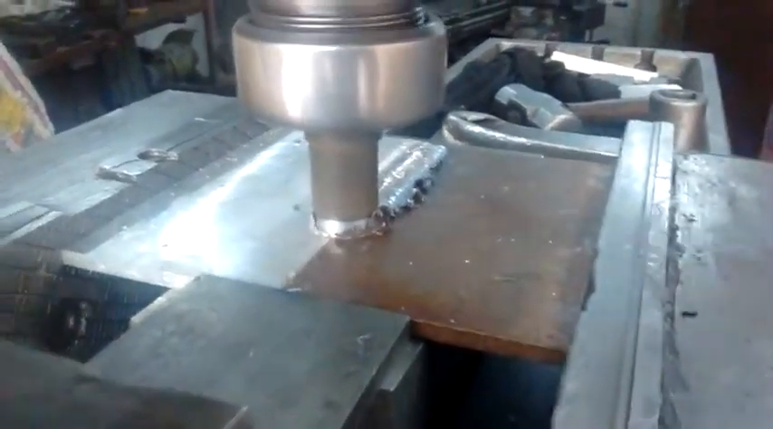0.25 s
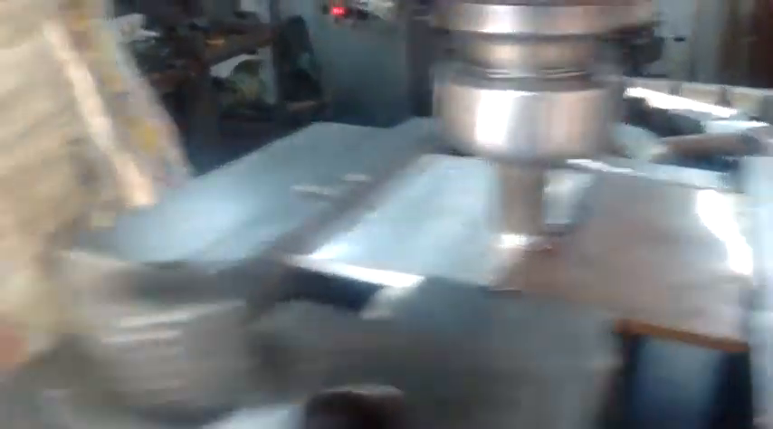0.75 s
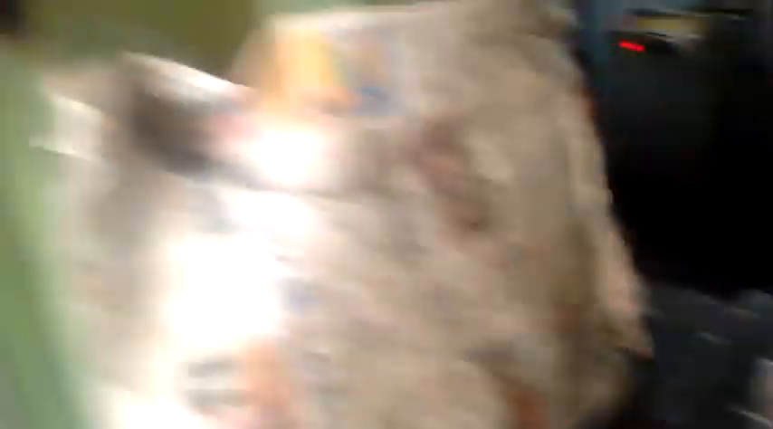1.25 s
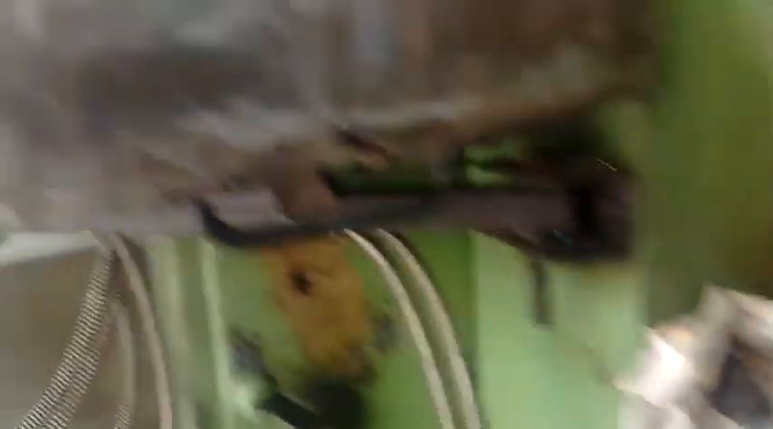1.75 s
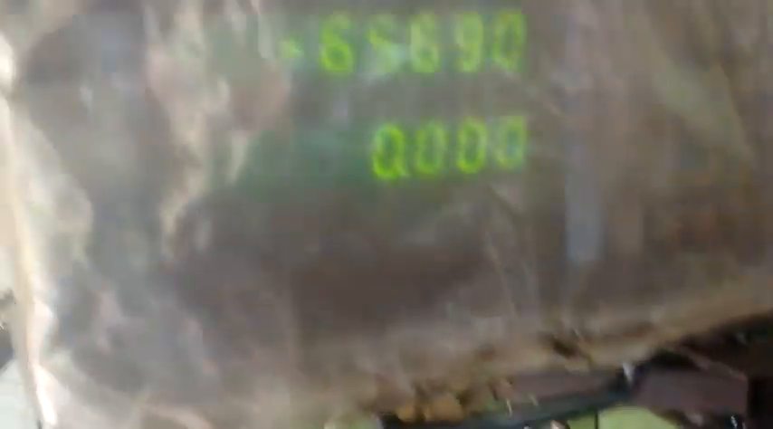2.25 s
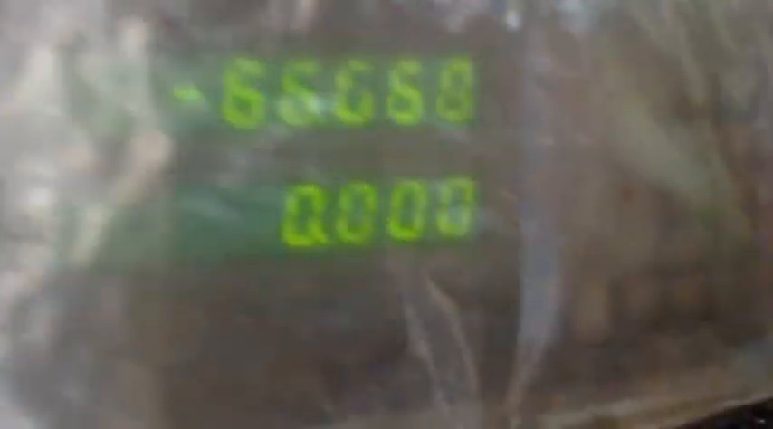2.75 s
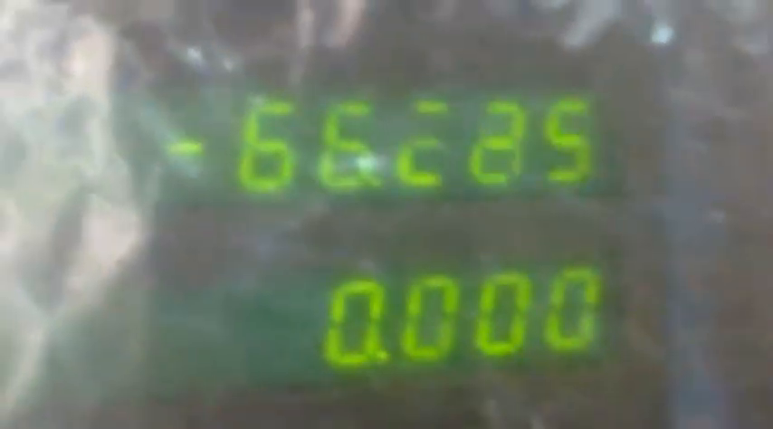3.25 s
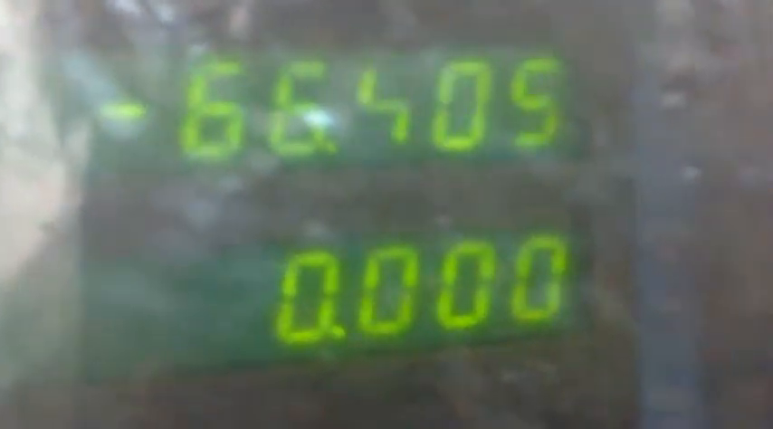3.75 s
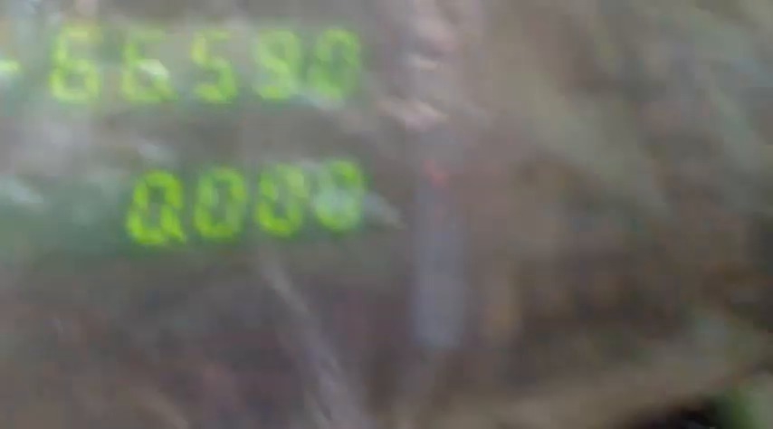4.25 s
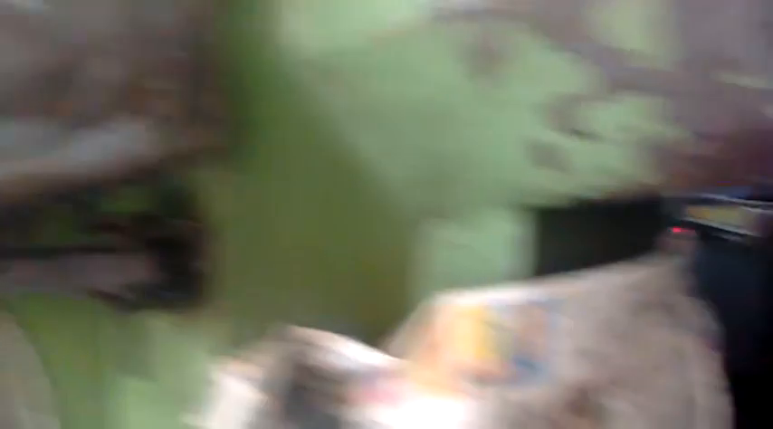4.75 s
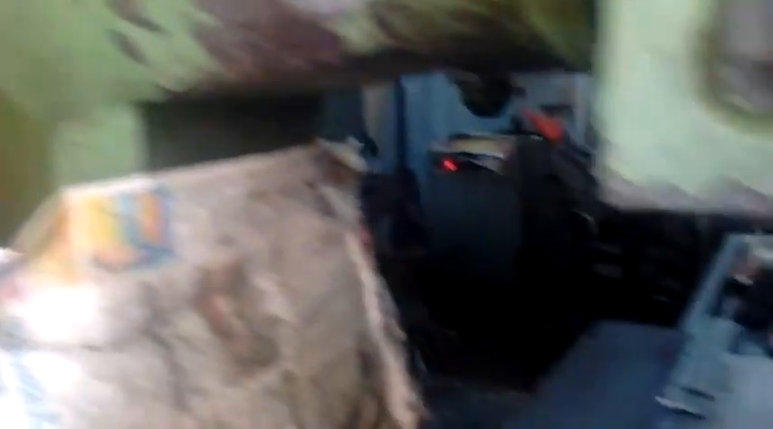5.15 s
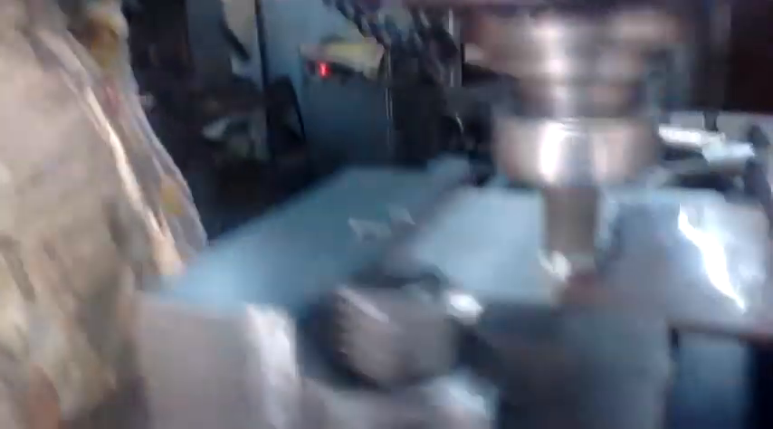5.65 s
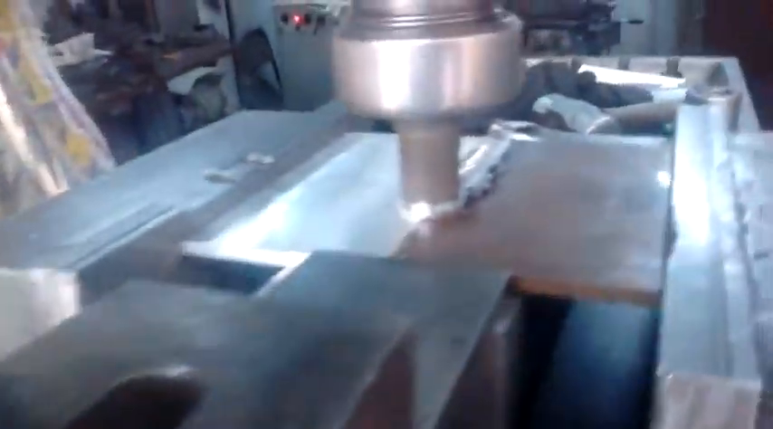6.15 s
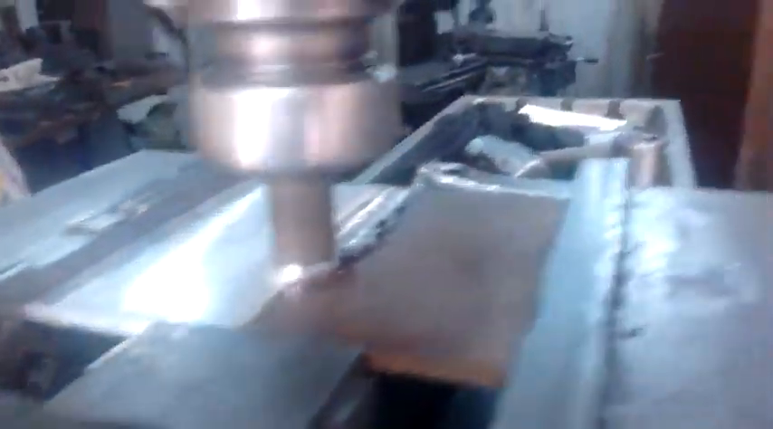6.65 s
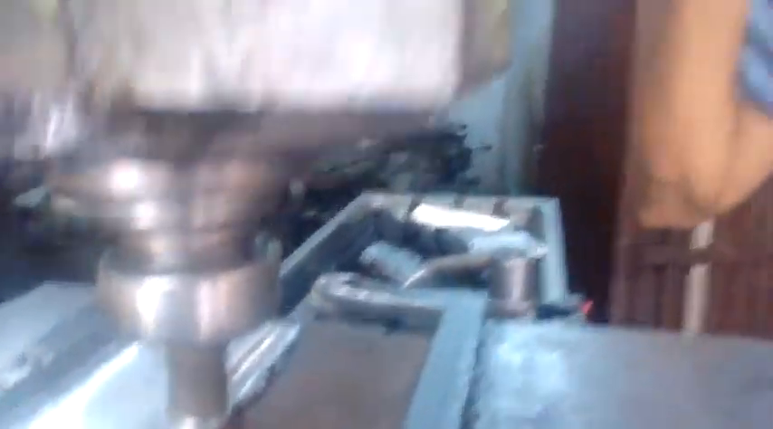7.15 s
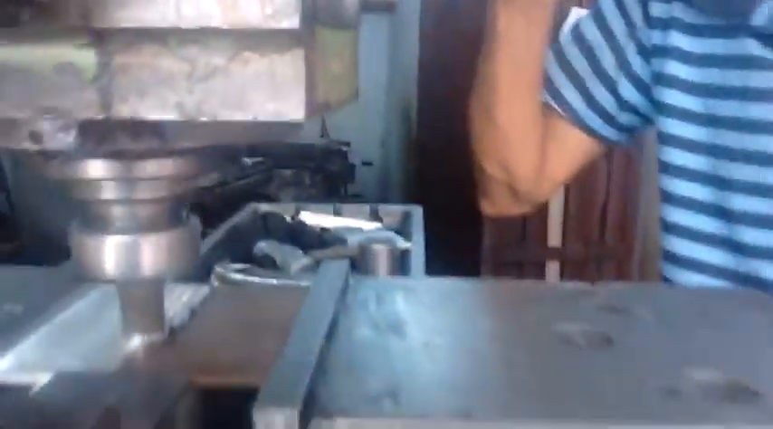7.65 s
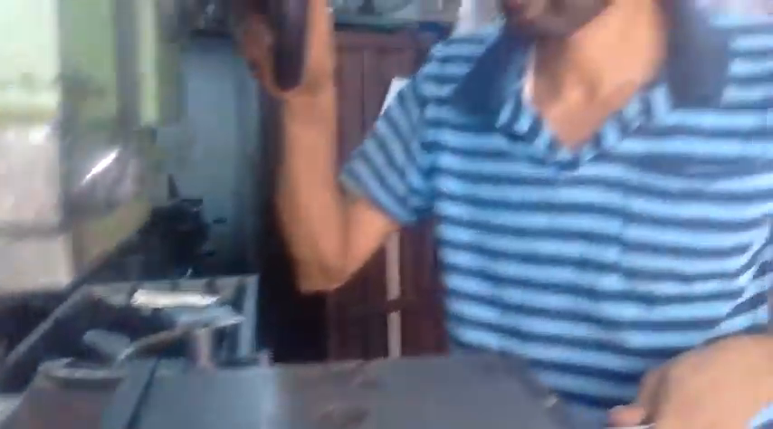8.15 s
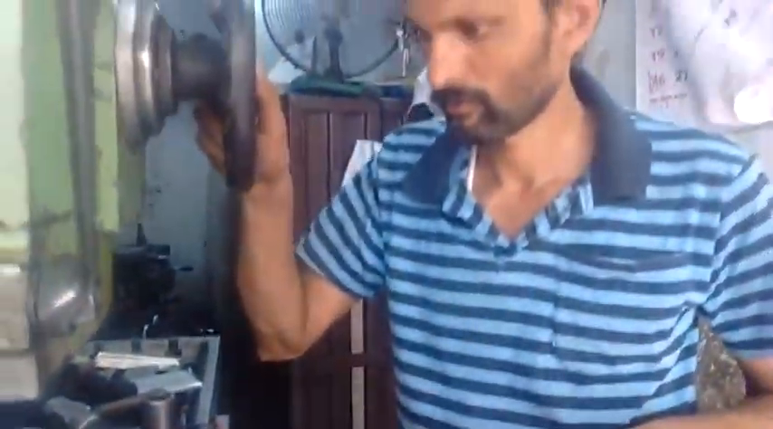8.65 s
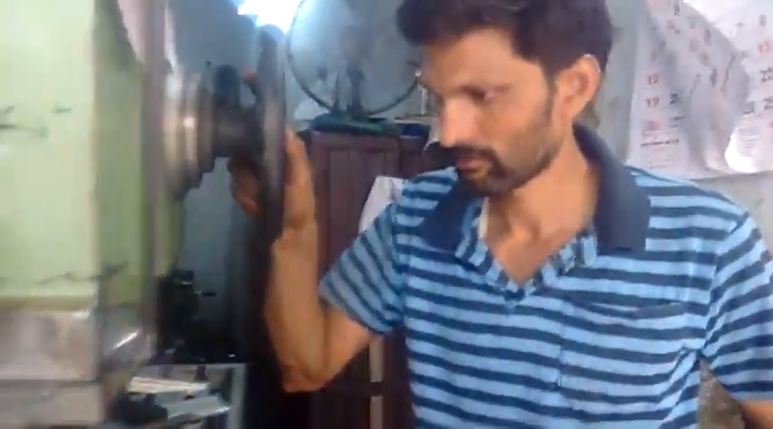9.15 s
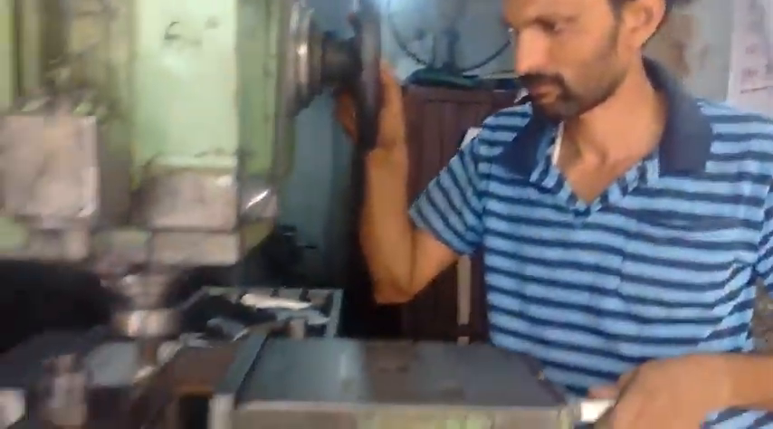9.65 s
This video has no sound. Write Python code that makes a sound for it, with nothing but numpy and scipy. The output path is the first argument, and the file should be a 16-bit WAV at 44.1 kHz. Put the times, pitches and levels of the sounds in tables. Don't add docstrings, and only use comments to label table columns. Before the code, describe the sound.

A vertical mill takes a light cut in a small workshop. A dense, loud mid-range roar of bearings and casing never stops, threaded with steady-pitched gear whines that swell and fade as the handheld phone moves. Cutting hiss is brightest at the start, duller when the phone turns to the readout, then partly returns. Small chips tick now and then, and fingers bump the phone softly twice.

```python
import sys
import numpy as np
from scipy import signal
from scipy.fft import rfft, irfft, next_fast_len
from scipy.io import wavfile
from scipy.ndimage import uniform_filter1d, map_coordinates

SR = 44100
rng = np.random.default_rng(int(sys.argv[2]) if len(sys.argv) > 2 else 0)


def voltage_ratio(decibels):
    exponent = np.asarray(decibels, float) / 20
    return 10 ** exponent


def unload_wav(signal):
    wavfile.write(
        sys.argv[1],
        SR,
        np.round(np.clip(np.atleast_2d(signal).T, -1, 1) * 32767).astype(np.int16),
    )


N = 437031
TIME = np.arange(0, N + 64, 64) / SR

SPINDLE_HZ, FEED_HZ, BACK_HZ = 586.4, 639.7, 156.26
SHAFT_HZ = 22.55
SWELL_EDGE_S = 0.3

# (frequency [Hz], in-step likeness [-1..1])
LIKE = [(0, .35), (250, .5), (700, .7), (1600, .93), (2950, -.8), (4750, .86), (6350, -.955), (8050, .76),
        (9350, -.52), (10400, .04), (10950, -.23), (12150, .6), (14100, -.7), (15250, .84)]
# (time [s], level [dB])
HISS = [(0.0, -47), (0.02, -49.5), (0.77, -48.5), (0.82, -50.5), (2.93, -57.5), (4.63, -55.5),
        (5.24, -51.5), (5.43, -52.5), (6.43, -50.5), (6.82, -50), (6.85, -51), (7.15, -49), (8.36, -55),
        (8.86, -51.5), (9.88, -54.5), (9.91, -54)]


def gears():
    # (floor [dB], swells (start [s], length [s], level [dB]))
    spindle = [
        (-36, [(-.2, 1.49, -19), (.17, 0.092, -14), (.41, 0.073, -16.5), (.72, 0.043, -22), (1.8, 1.13, -24), (2.85, 1.63, -21.5), (3.5, 0.36, -23), (1.4, 0.29, -37), (4.5, .3, -28), (5.15, 0.36, -22), (5.62, 4.3, -21.5), (5.75, 0.32, -23.5), (6.13, 0.31, -19.5), (6.55, 0.2, -18), (7.98, 0.12, -22), (8.6, 0.76, -23.5)]),
        (-33, [(-.1, 0.42, -27.5), (.75, 0.49, -29), (1.65, 0.79, -15), (2.42, 0.38, -15), (2.8, 0.23, -21), (2.9, 1.73, -21.5), (4.15, 0.56, -19.5), (4.72, 0.79, -28), (5.15, 0.26, -23), (6.4, 0.34, -34), (7.45, 0.36, -25), (8.0, 0.99, -23.5), (9.05, 0.59, -30.5)]),
    ]
    feed = [
        (-40, [(1.38, 0.43, -30), (1.88, 0.67, -26), (2.45, 0.52, -30), (3.3, .5, -37), (4.0, .4, -42), (4.4, 0.5, -29), (5.2, 0.74, -31), (7.75, 0.54, -24.5), (7.95, .3, -28), (8.35, .5, -30), (8.9, 0.33, -24.5), (9.15, 0.28, -30), (9.56, .5, -31)]),
        (-32.5, [(-.2, 1.38, -24.5), (2.55, 0.58, -25.5), (3.2, 0.45, -23), (3.7, 0.71, -24.5), (4.75, 0.44, -26.5), (5.65, .3, -27.5), (6.3, 0.52, -30), (7.25, 0.21, -26), (7.75, 0.52, -28), (8.5, 0.7, -25.5), (8.72, 0.3, -20.5), (9.5, 0.25, -27)]),
            (-55, [(1.65, 0.22, -36), (2.05, 0.55, -34), (3.3, 0.73, -37), (4.5, 0.32, -37)]),
        (-57, [(.55, 0.18, -56), (.92, .3, -36.5), (1.22, .5, -43), (2.0, 0.45, -39), (2.5, 0.35, -43), (2.9, 0.5, -38), (3.5, .75, -37), (4.25, 0.58, -41.5), (4.96, 0.36, -33), (5.35, 0.3, -43), (5.75, 0.36, -46), (7.3, .35, -50), (7.5, 0.15, -37), (7.7, .35, -47), (8.2, .3, -53), (8.5, 0.37, -37.5), (9.02, .4, -45), (9.48, 0.28, -36), (9.8, .3, -44)]),
    ]
    back = [
        (-40, [(.8, 0.29, -41), (1.5, .4, -30.5), (1.9, 1.14, -26), (3.0, 1.92, -30), (7.9, 0.41, -36), (8.6, 0.74, -39), (9.5, .6, -36)]),
        (-40, [(-.2, 0.67, -30), (.4, 0.93, -27), (2.5, 0.18, -28), (4.7, 0.39, -28.5), (5.65, 1.2, -24.5), (7.02, 0.3, -23.5), (7.6, 0.39, -25.5)]),
        (-47, [(-.2, 1.45, -27), (2.05, .15, -33), (2.72, 0.32, -32), (4.7, 0.82, -29.5), (5.5, 1.45, -26.5), (5.75, 0.23, -32), (6.95, .95, -31), (9.15, 0.068, -26), (9.38, 0.1, -27), (9.8, .3, -28)]),
        (-61, [(-.2, 1, -42), (1.05, 0.55, -29.5), (4.1, 0.42, -38), (4.7, 0.78, -32.5), (6.3, 0.56, -31), (7.05, 0.73, -32), (8.6, 0.35, -39), (9.7, .4, -35)]),
    ]
    # (multiple [-], level [dB])
    spindle_rest = [(3, -39)]
    feed_rest = [(1, -42), (6, -49.5)]
    back_rest = [(1, -69), (2, -68), (4, -34.5), (5, -34.5), (6, -34), (7, -41), (8, -44), (10, -37),
                 (12, -39.5), (17, -44), (19, -49)]
    # (lower, upper) shaft sideband against its tone [dB]
    runout_db = (-16, -24)
    out = gear(SPINDLE_HZ, spindle, (1, 2), spindle_rest, runout_db)
    out += gear(FEED_HZ, feed, (2, 3, 4, 5), feed_rest)
    return out + gear(BACK_HZ, back, (3, 9, 13, 14), back_rest)


def gear(hz, table, orders, rest, runout_db=None):
    # (floor [dB], swells (start [s], length [s], level [dB]))
    across = [
        (-38, [(.75, .8, -34), (3.35, .9, -31), (4.9, 1.3, -33), (8.85, 1.2, -38)]),
        (-42, [(1.15, 0.5, -33), (2.1, 0.62, -40), (4.75, 0.5, -34), (8.35, 1.2, -33.5)]),
        (-44, [(2.05, 0.7, -33), (4.8, 0.42, -35), (5.7, .35, -38), (9.25, .4, -32)]),
        (-33.5, [(2.1, 0.39, -34), (7.45, 0.32, -32), (9.3, .8, -33)]),
    ]
    across = dict(zip((SPINDLE_HZ, 2 * SPINDLE_HZ, 3 * FEED_HZ, 5 * FEED_HZ), across))
    rough_per_khz = 0.1
    narrow_hz = 1490
    out = sum(whine(k * hz, db, 5.0, 0.85) for k, db in rest)
    for k, tone in zip(orders, table):
        tone_hz = k * hz
        same = swing(LIKE, tone_hz)
        edge_s = SWELL_EDGE_S * min(1, narrow_hz / tone_hz)
        sum_db = swells(*tone, TIME, edge_s) - 10 * np.log10(.5 + .5 * same)
        if tone_hz in across:
            second_db = swells(*across[tone_hz], TIME) + 2.8 - 10 * np.log10(.5 - .5 * same)
        else:
            second_db = 0.36 * sum_db + 0.59 * np.mean(sum_db)
        db = np.array([sum_db, second_db])
        out += whine(tone_hz, db, 0.24, 0.26, rough=0.12 + rough_per_khz * tone_hz / 1000)
        for side, side_db in zip((-1, 1), runout_db or ()):
            out += whine(tone_hz + side * SHAFT_HZ, db + side_db, 2.7, 0.44)
    return out


def whine(hz, db, wander_db, drift, rough=None):
    flutter_per_s, flutter_db = 28, 4.5
    strength = voltage_ratio(db + wander_db * np.minimum(walk(1.5, count=2), 1)) * np.sqrt(2)
    phase = rng.uniform(0, 2 * np.pi) + np.array([[0], [np.pi / 2]])
    phase = phase + 2 * np.pi * hz * TIME + drift * walk(3.0, count=2)
    if rough:
        flutter = rough * walk(flutter_per_s, count=2)
        strength = strength * voltage_ratio(flutter_db * np.minimum(flutter[0], rough / 2))
        phase = phase + flutter[1]
    return full(strength) * np.sin(full(phase))


def tool_tones():
    # (multiple [-], level [dB])
    multiples = [(16, -59), (18, -41), (25, -57), (26, -52.5), (27, -54), (28, -57), (29, -64), (30, -62),
                 (33, -72), (34, -68)]
    view_db = curve(HISS, TIME)
    view_db = 0.52 * (view_db - view_db.mean())
    return sum(whine(k * BACK_HZ, db + view_db, 3.7, 0.73, rough=1.49) for k, db in multiples)


def bearing_tones():
    crest_hz = (629.8, 2886.6, 213.3, 2345.6, 3750.2, 3943.3, 4219.0, 5117.6)
    # (floor [dB], swells (start [s], length [s], level [dB]))
    crests = [
        (-35.5, [(1.9, 0.94, -39), (3.9, 0.38, -26), (5.6, 0.49, -30), (7.7, 1, -25.5), (8.85, 0.18, -18), (9.45, 0.19, -20)]),
        (-41, [(-.2, 1.3, -35), (2.0, 0.48, -33), (5.6, 0.32, -35), (6.9, 0.39, -38), (8.3, .4, -45)]),
        (-39.5, [(.5, 1, -41), (3.6, 0.39, -41), (5.4, 4.1, -37)]),
        (-43, [(.5, 0.42, -31), (1.4, 0.28, -27), (2.05, 0.78, -31), (2.9, 0.9, -34), (4.2, 0.33, -30), (4.9, 0.27, -32.5), (6.1, .35, -41), (6.55, 0.28, -39), (8.4, 0.58, -35), (9.6, .4, -34)]),
        (-55, [(.4, 0.46, -39.5), (5.75, .35, -47)]),
        (-51.5, [(1.5, 0.68, -43), (3.2, 0.98, -41.5), (4.4, .2, -42), (6.3, .3, -42), (7.1, 0.27, -41), (9.75, .3, -43)]),
        (-55, [(.6, 0.58, -42), (5.6, .3, -44)]),
        (-56.5, [(2.3, 0.84, -48), (3.7, .7, -48), (9.65, .4, -55)]),
    ]
    # (frequency [Hz], level [dB])
    steady = [(61.2, -55), (83.4, -53), (113.7, -43.5), (119.8, -50), (622.4, -42), (633.9, -38.5),
              (679.6, -34), (721.5, -43), (738.9, -44), (897.0, -38.5), (985.8, -37.5), (1359.3, -35.5),
              (1901.7, -40), (2172.8, -44), (3921.5, -55), (7676.4, -73)]
    faint_hz = (542, 548, 576, 693.5, 709.5, 797.5, 872, 923, 1141, 1245, 1332, 1372.5, 1420, 1464, 1713.9,
                2165.4)
    faint_db, rough_per_khz = -42.5, 0.16
    out = sum(whine(hz, db, 6.0, 0.4) for hz, db in steady)
    out += sum(whine(hz, faint_db, 7.2, 0.63) for hz in faint_hz)
    for hz, (floor_db, rows) in zip(crest_hz, crests):
        out += whine(hz, swells(floor_db, rows, TIME), 2.1, 0.52, rough=rough_per_khz * hz / 1000)
    return out


def roar():
    band_hz = (90, 320, 900, 4300, 8800, 12400, 15000)
    cutter_hz, chip_hz = 13.5, 15.2
    turn_hz, turn_db, turn_s = 3.97, -0.34, 0.11
    hz, s, cells = signal.stft(rng.standard_normal((2, N)) * np.sqrt(SR / 2), SR, nperseg=512)
    octave = np.log(np.maximum(hz, 1))
    share = np.array([np.interp(octave, np.log(band_hz), row) for row in np.eye(len(band_hz))]).T
    cut_share = share[:, 3:4]
    hiss_share = share[:, 4:].sum(axis=1, keepdims=True)
    above_boom = 1 - share[:, :2].sum(axis=1, keepdims=True)

    bands_db = places(s)
    bands_db -= bands_db.mean(axis=1, keepdims=True)
    gain_db = share @ bands_db
    cut_db = bands_db[3]
    gain_db += 1.1 * (1 - cut_share) * (cut_db - uniform_filter1d(cut_db, size=70))

    height, along = np.meshgrid(np.linspace(0, 1, len(hz)) ** 0.724, s / s[-1], indexing="ij")
    patch = rng.standard_normal((70, 50))
    gain_db += (0.99 + 1.2 * hiss_share) * map_coordinates(patch, [height * 69, along * 49], order=1)
    clump = rng.standard_normal((24, 110))
    gain_db += 1.26 * (1 - hiss_share) * map_coordinates(clump, [height * 23, along * 109], order=1)

    gain_db += cut_share * 0.64 * np.sin(2 * np.pi * cutter_hz * s)
    chip_db = 0.4 * np.sin(2 * np.pi * chip_hz * s) + 0.29 * np.sin(2 * np.pi * 2 * chip_hz * s)
    gain_db += hiss_share * chip_db
    gain_db += above_boom * turn_db * np.cos(2 * np.pi * turn_hz * (s - turn_s))
    gain_db += resonances(hz[:, None], s)

    noise = signal.istft(cells * voltage_ratio(gain_db), SR, nperseg=512)[1][:, :N]
    seconds = np.arange(N) / SR
    mesh = 1 + .04 * np.sin(2 * np.pi * BACK_HZ * seconds)
    grain = full(voltage_ratio(1.0 * walk(90)))[0]
    return noise * mesh * grain + chips(np.interp(seconds, s, bands_db[5]))


def resonances(hz, s):
    # (start [s], length [s], centre [Hz], rise [dB])
    sheen = [
        (-.2, 1.7, 2020, 1.5),
        (2.8, 1.6, 2220, -3),
        (5.6, 1.4, 2080, 3),
        (.5, .7, 12700, 3),
        (4.6, 0.86, 12900, 7),
        (5.7, 1.1, 12300, 5),
        (7.0, 0.76, 12500, 4),
    ]
    rasp_hz = 4180 + 90 * np.interp(s, TIME, walk(1.43)[0])
    flare = 1 + 0.16 * np.interp(s, TIME, walk(6.5)[0])
    db = 2 * flare * bell(hz, rasp_hz, 520)
    db += -2 * bell(hz, 3510, 71)
    for start_s, length_s, centre_hz, rise_db in sheen:
        inside_s = np.minimum(s - start_s, start_s + length_s - s)
        db += rise_db * bell(hz, centre_hz, 140) * ramp(inside_s)
    return db


def places(s):
    # (floor [dB], swells (start [s], length [s], level [dB]))
    rumble = (-38, [(1.15, 3.2, -36), (4.35, 0.98, -35), (4.95, 2.9, -38), (9.2, 0.48, -39)])
    boom = (-31, [(.2, 0.67, -29.5), (1.15, 1.4, -32), (2.95, 1.5, -35), (5.7, 1.7, -34), (8.6, 1.3, -40)])
    # (time [s], length [s], change [dB])
    load = [(0.0, 0.45, -0.5), (0.343, 0.062, -1), (.9, 0.79, 1), (0.84, 0.04, -1.5), (3.144, 0.072, -2.5),
            (3.465, 0.045, -1), (4.036, 0.1, -4), (4.545, 0.078, -2), (4.813, 0.12, 1), (5.05, .05, 1.5),
            (5.303, 0.035, 2.5), (5.74, .05, 1), (5.506, 0.31, -0.5), (6.225, 0.042, -2),
            (6.455, 0.063, 0.5), (6.878, 0.16, -3.5), (7.794, 0.077, 3), (7.89, 0.042, 0.5),
            (8.043, 0.049, 3), (8.402, 0.098, -4.5), (8.754, 0.062, -0.5), (9.782, 0.08, -1.5)]
    view_shares = (0.57, 0.97, 0.8)
    close_s, close_db = 1, 5
    away_s, away_db = 6.3, -5.5
    load_db = sum(db * bell(s, at_s, length_s / 2) for at_s, length_s, db in load)
    load_db += 0.4 * np.interp(s, TIME, walk(9.0)[0])
    low, middle, top = np.outer(view_shares, curve(HISS, s))
    shade_db = away_db * ramp(s - away_s)
    middle = middle + shade_db / 2
    top = top + close_db * ramp(close_s - s) + shade_db
    ring = 0 * s
    return np.array([swells(*rumble, s), swells(*boom, s), ring, load_db, low, middle, top])


def chips(hiss_db, rate=80., db=38.0, spread_db=2.5, tick_db=89.5, ring_s=0.0034):
    # (time [s], peak level [dB])
    ticks = [
        (0.4713, -33),
        (0.6744, -33),
        (0.8624, -33),
        (5.0185, -33),
        (5.1093, -34),
        (5.5458, -37),
        (5.6067, -43),
        (5.8127, -38),
        (6.7999, -36),
        (7.2559, -34),
    ]
    size_db = spread_db * np.minimum(rng.exponential(size=N), 3)
    hit = (rng.random(N) < rate / SR) * voltage_ratio(db + size_db + hiss_db)
    for s, peak_db in ticks:
        hit[int(s * SR)] += voltage_ratio(tick_db + peak_db)
    decay = np.exp(-np.arange(1024) / (ring_s * SR))
    ring = signal.fftconvolve(hit, decay)[:N] * rng.standard_normal((2, N))
    return signal.sosfilt(signal.butter(3, (8800, 13500), "band", fs=SR, output="sos"), ring)


def thumps(length_s=.012):
    # (time [s], peak level [dB], pitch [Hz])
    knocks = [
        (5.462, -25, 90),
        (8.318, -23, 75),
    ]
    knock = 0
    for s, db, hz in knocks:
        knock = knock + voltage_ratio(db) * bell(TIME, s, length_s) * np.cos(2 * np.pi * hz * (TIME - s))
    return full(knock) * np.array([[-1], [.8]])


def ports(noise, tones):
    # (frequency [Hz], density [dB per Hz])
    casing = [(25, -72.5), (70, -69.5), (130, -53.5), (350, -52), (600, -48), (1300, -50.5), (2150, -53),
              (2500, -55.5), (5300, -74), (6300, -78), (9500, -78), (11600, -85.5), (13000, -86.5),
              (15500, -86.5)]
    # (frequency [Hz], likeness [-1..1])
    quarter = [(0, -0.3), (200, -0.15), (900, -0.097), (1400, 0.029), (2500, -0.17), (4050, -0.36),
               (5300, 0.042), (7400, -0.22), (8500, -.06), (9800, .38), (11200, -0.3), (12800, .15),
               (14100, 0), (14650, -.4)]
    # (frequency [Hz], left minus right [dB])
    tilt = [(60, -11.5), (110, -4), (200, -4), (380, -2), (700, 1.5), (1290, 0.5), (2380, 2.5), (4400, 3),
            (8120, -1.5), (15000, 2.5)]
    size = next_fast_len(N)
    hz = np.arange(size // 2 + 1) * SR / size
    a, b = rfft(noise, size) * voltage_ratio(octave_curve(casing, hz)) + rfft(tones, size)
    same = swing(LIKE, hz)
    tie = np.clip(swing(quarter, hz) / np.sqrt(1 - same ** 2), -.95, .95)
    mid = np.sqrt(.5 + .5 * same) * a
    side = np.sqrt(.5 - .5 * same) * (-1j * tie * a + np.sqrt(1 - tie ** 2) * b)
    tilt_db = octave_curve(tilt, hz) / 2
    left_right = np.array([(mid + side) * voltage_ratio(tilt_db), (mid - side) * voltage_ratio(-tilt_db)])
    return irfft(left_right, size)[:, :N]


def turning():
    # (time [s], left minus right [dB])
    pan = [(0.0, 1.5), (0.72, 1), (1.32, 0.5), (2.37, 0), (3.62, -1), (5.77, 1.5), (7.75, 1), (8.75, 1.5),
           (9.58, 1.5), (9.91, 2.5)]
    pan_db = curve(pan, TIME)
    pan_db = pan_db - np.mean(pan_db)
    return full(voltage_ratio(np.array([pan_db, -pan_db]) / 2))


def thin(x, under_db=-9.0, chance_db=7.5, faint_db=-3.5, rise_db=5.0, leak_db=-8.5, top_hz=15150.0, share=.45):
    window = np.sin(np.pi * (np.arange(2048) + .5) / 2048)
    sum_difference = np.array([x[0] + x[1], x[0] - x[1]]) / 2
    hz, s, cells = signal.stft(sum_difference, SR, window, nperseg=2048)
    band, above = np.arange(len(hz)) // 16, hz[:, None]
    power = np.abs(cells) ** 2
    starts = np.flatnonzero(np.diff(band, prepend=-1))
    band_power = np.add.reduceat(power, starts, axis=1)[:, band] + 1e-30
    luck = np.sqrt(2) * uniform_filter1d(rng.standard_normal((band[-1] + 1, len(s))), size=2)[band]
    masked = (band_power < voltage_ratio(2 * under_db) * band_power.sum(axis=0)) & (above > 5300)
    around = uniform_filter1d(uniform_filter1d(power.mean(axis=0), size=120, axis=0), size=30, axis=1)
    treble = np.clip((above - 8800) / 6000, 0, 1)
    threshold_db = faint_db + rise_db * treble + chance_db * luck
    faint = (power < voltage_ratio(2 * threshold_db) * around) & (treble > 0)
    starved = np.repeat(rng.random(len(s)) < share, 2)[:len(s)] & (above > top_hz)
    leaking = (luck[band // 2 * 32] < -1.2) * masked
    spill = voltage_ratio(leak_db) * leaking * cells[::-1] * rng.standard_normal(cells.shape)
    kept = cells * ~(masked | starved | faint) + spill
    mid, side = signal.istft(kept, SR, window, nperseg=2048)[1][:, :N]
    return np.array([mid + side, mid - side])


def swells(floor_db, rows, s, edge_s=SWELL_EDGE_S):
    power = voltage_ratio(2 * floor_db) + 0 * s
    for start, length_s, db in rows:
        inside = np.minimum(s - start, start + length_s - s) / min(edge_s, length_s)
        power += voltage_ratio(2 * db) * np.sin(np.pi / 2 * np.clip(inside + .5, 0, 1)) ** 2
    return 10 * np.log10(power)


def walk(rate, count=1):
    k = int(SR / rate)
    knots = 1.53 * rng.standard_normal((count, N // k + 3))
    place = TIME * SR / k
    j = place.astype(int)
    slew = .5 - .5 * np.cos(np.pi * (place % 1))
    return knots[:, j] * (1 - slew) + knots[:, j + 1] * slew


def swing(table, hz):
    rows = np.array(table)
    index = np.arange(len(rows))
    place = np.interp(hz, rows[:, 0], index)
    place = np.floor(place) + .5 - .5 * np.cos(np.pi * (place % 1))
    return np.clip(np.interp(place, index, rows[:, 1]), -.98, .98)


def curve(table, x):
    return np.interp(x, *np.transpose(table))


def octave_curve(table, hz):
    points_hz, values = np.transpose(table)
    return np.interp(np.log(np.maximum(hz, 1)), np.log(points_hz), values)


def bell(x, centre, width):
    return np.exp(-.5 * ((x - centre) / width) ** 2)


def ramp(s):
    return np.clip(s / SWELL_EDGE_S + .5, 0, 1)


def full(slow):
    return np.array([np.interp(np.arange(N) / SR, TIME, row) for row in np.atleast_2d(slow)])


def scene():
    tones = gears() + tool_tones() + bearing_tones()
    return ports(roar(), tones) * turning() + thumps()


def low_pass(x):
    return signal.sosfilt(signal.butter(12, 15620, fs=SR, output="sos"), x)


def record(dry):
    cut = signal.sosfilt(signal.ellip(10, .2, 70, 15420, fs=SR, output="sos"), dry)
    mix = np.clip(thin(cut), -1, 1)
    return low_pass(mix)


dry = scene()
out = record(dry)
unload_wav(out)
```